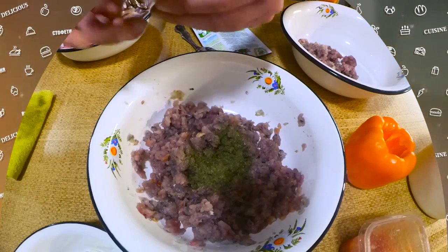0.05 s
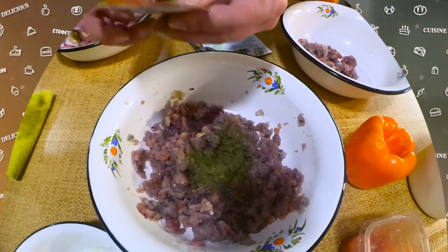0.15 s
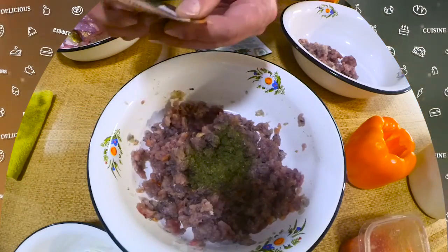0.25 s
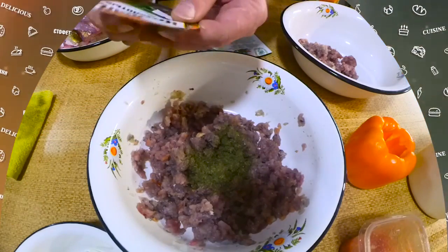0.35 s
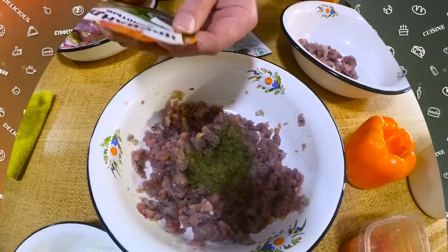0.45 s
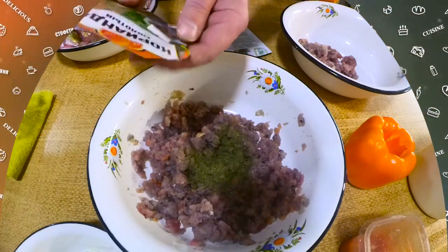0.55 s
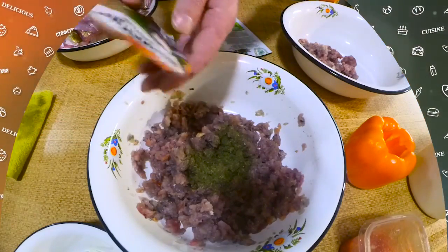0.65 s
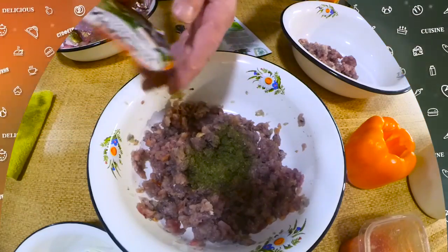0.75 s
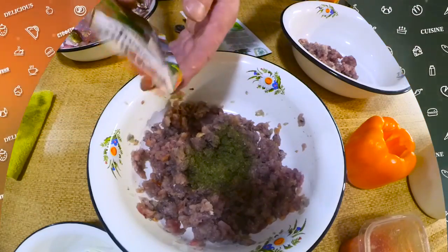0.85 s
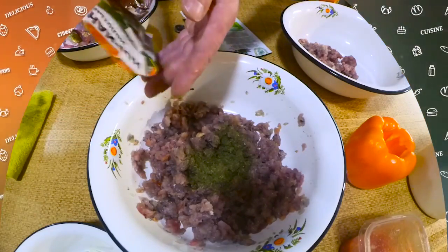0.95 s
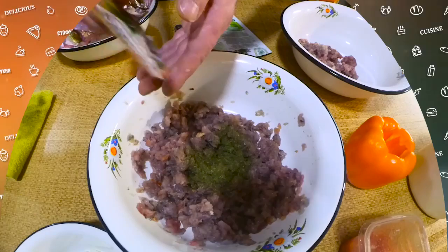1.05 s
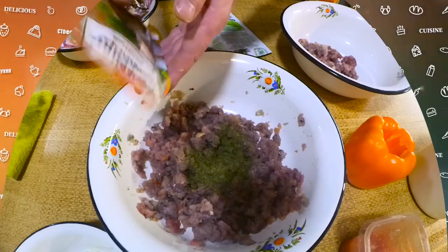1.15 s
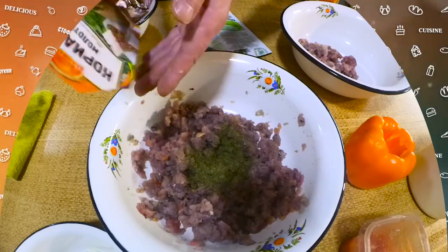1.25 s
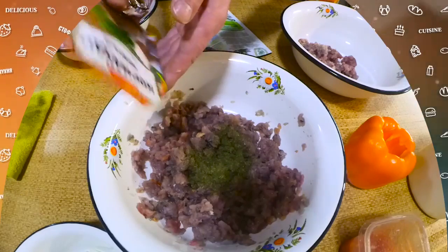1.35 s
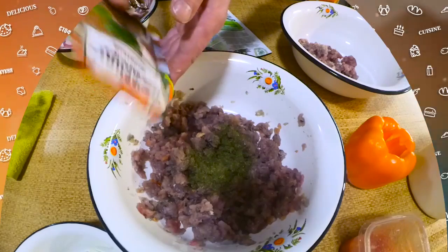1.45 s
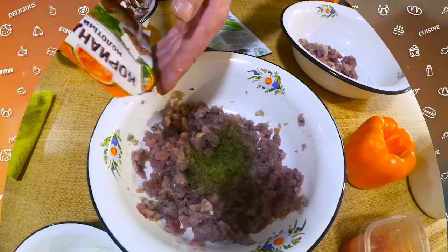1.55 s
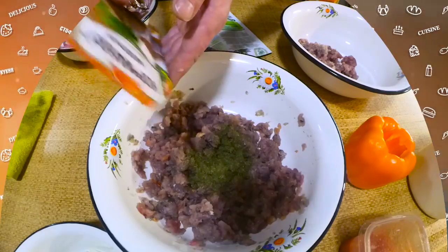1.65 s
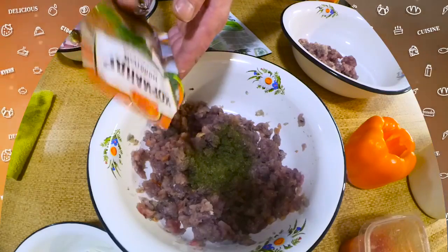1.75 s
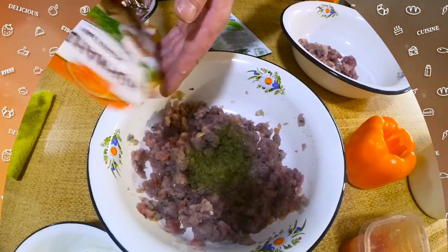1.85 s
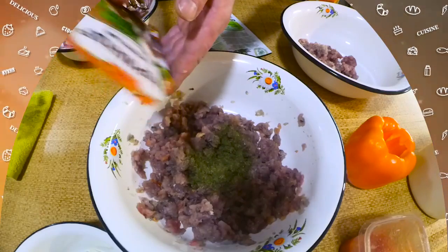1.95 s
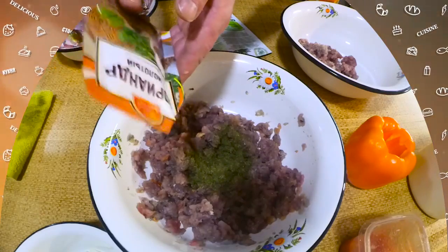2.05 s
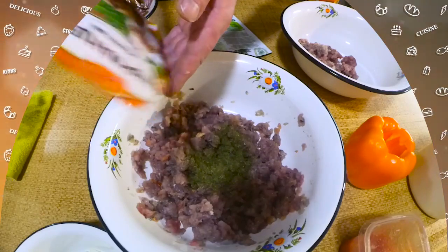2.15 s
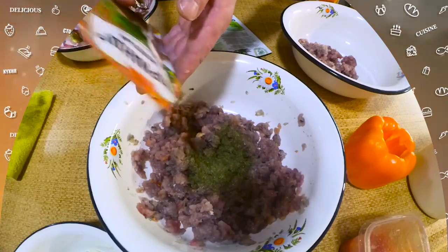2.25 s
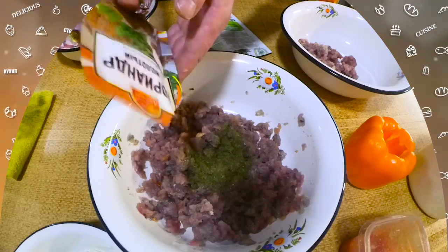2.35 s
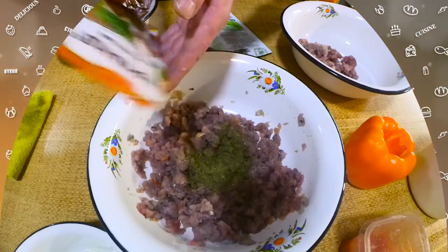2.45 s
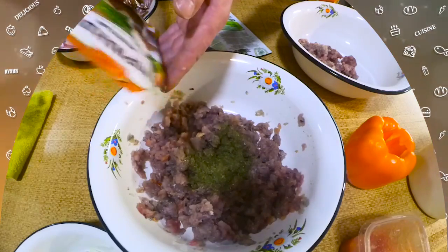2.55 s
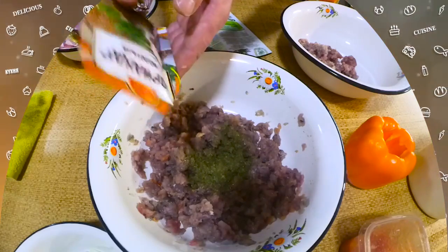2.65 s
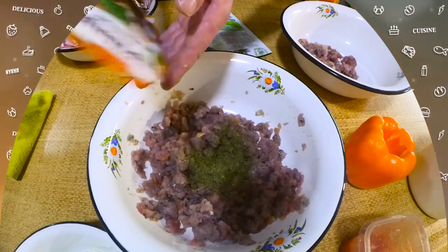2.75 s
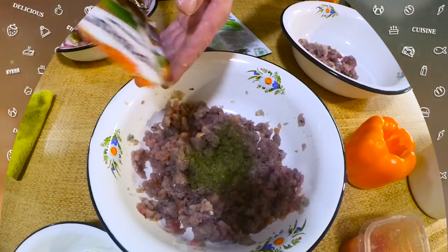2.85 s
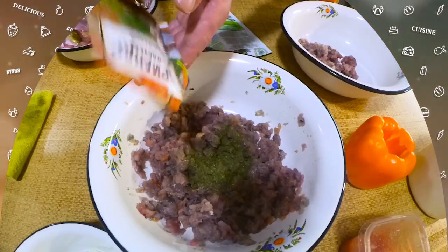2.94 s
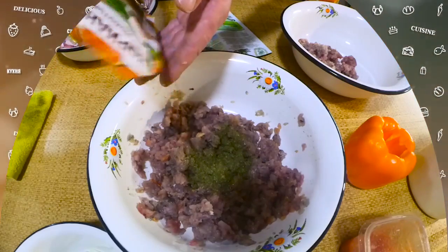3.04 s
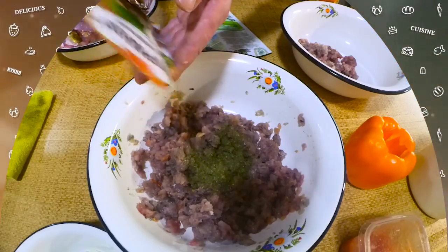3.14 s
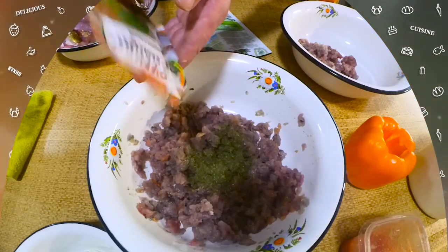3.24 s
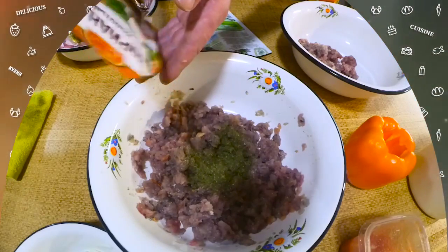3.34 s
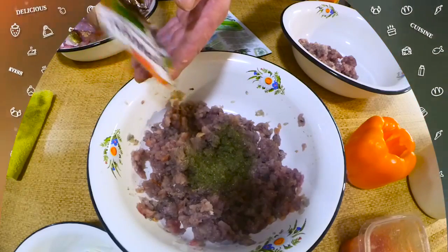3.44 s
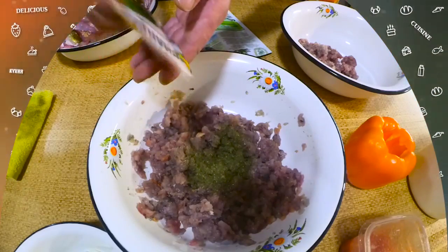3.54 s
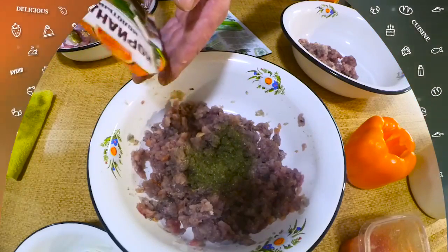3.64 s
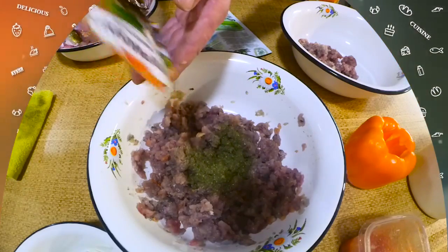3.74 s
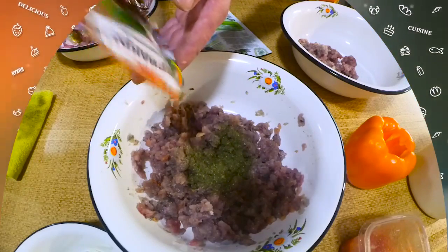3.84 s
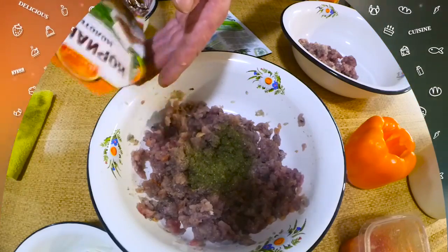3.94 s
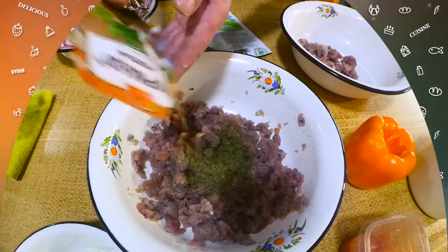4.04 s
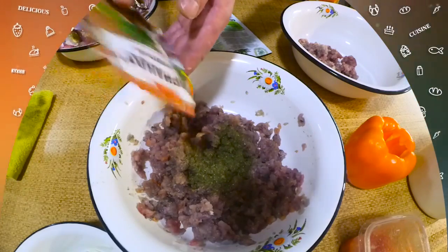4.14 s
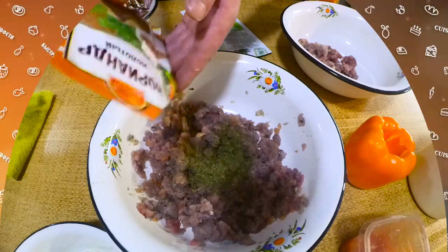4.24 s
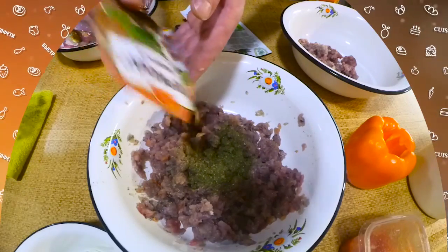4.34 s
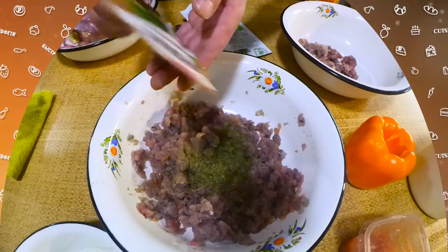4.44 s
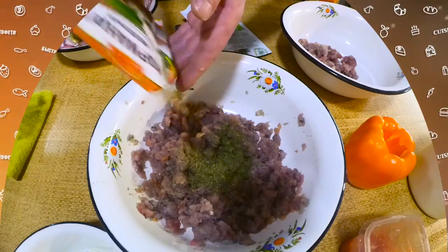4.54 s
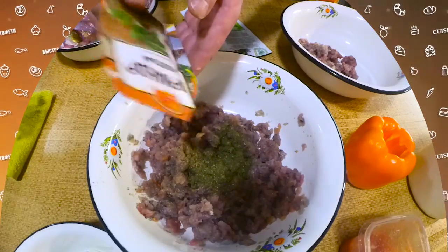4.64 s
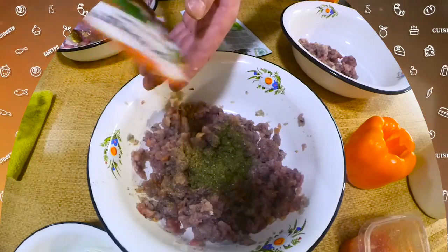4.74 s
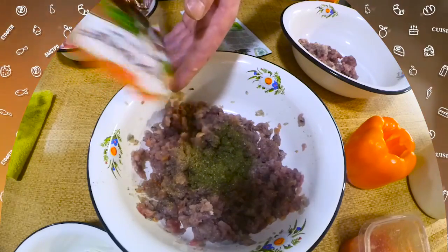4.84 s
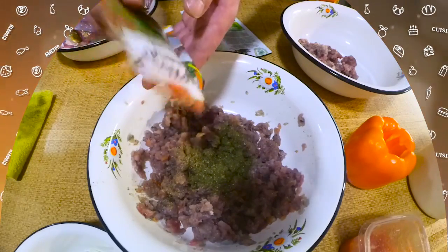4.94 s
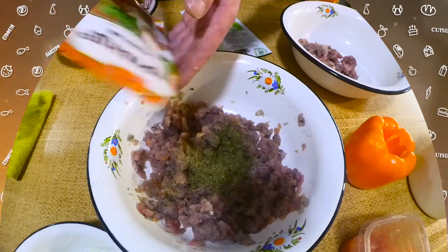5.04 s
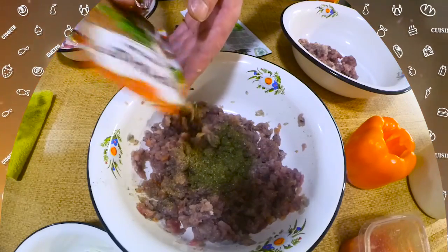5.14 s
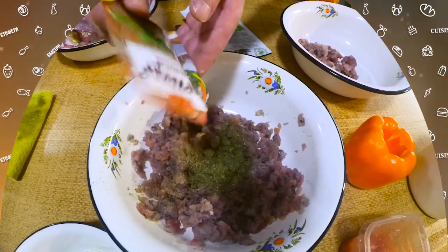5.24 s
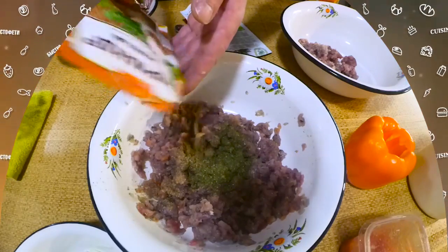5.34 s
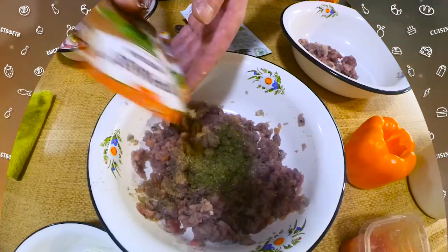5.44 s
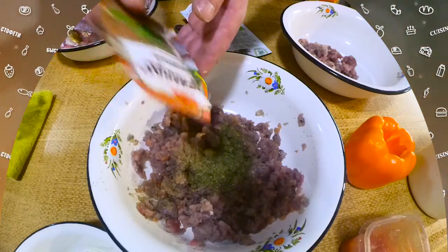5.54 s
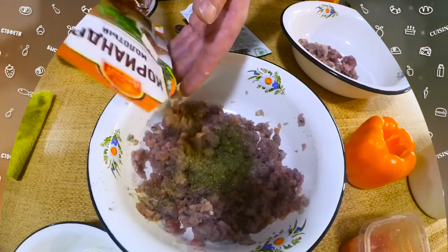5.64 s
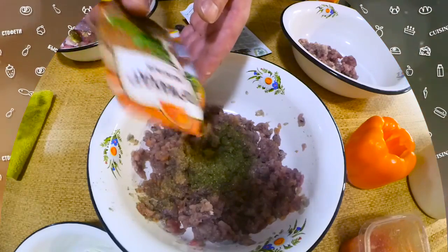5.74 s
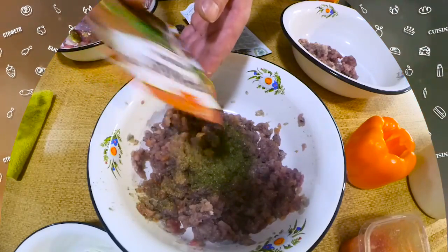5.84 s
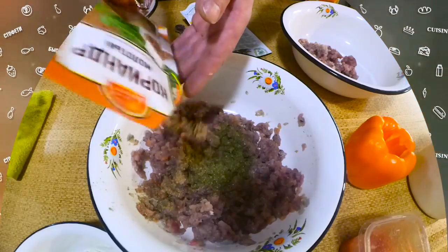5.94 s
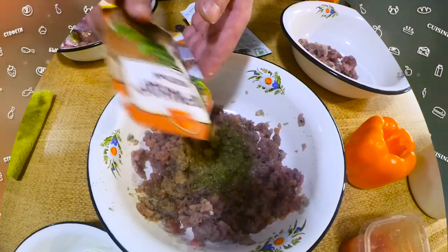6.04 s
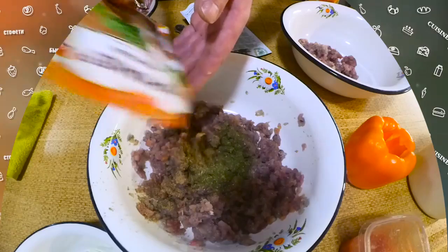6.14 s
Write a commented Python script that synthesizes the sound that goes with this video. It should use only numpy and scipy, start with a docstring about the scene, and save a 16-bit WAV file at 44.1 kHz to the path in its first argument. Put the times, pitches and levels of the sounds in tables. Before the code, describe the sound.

A small paper sachet rustles briefly, then is tapped rapidly against a palm, dry powder hissing with crisp papery ticks, close up in a quiet kitchen.

```python
"""First heard are sparse rustles and crackles as a paper sachet of ground spice is handled in a quiet kitchen.
It is then tapped against a palm about six times a second: filtered noise bursts are the powder rushing along
the paper, resonant clicks are creases snapping, and a bank of resonances is the air ringing inside. Pressure
pulses and low noise are the air that each swing pushes at the microphone. A short noise tail forms the kitchen
reflections; faint shaped noise forms the room rumble and hiss."""
import sys
import numpy as np
from scipy import signal
from scipy.fft import rfft, irfft, next_fast_len
from scipy.io import wavfile
from scipy.ndimage import uniform_filter1d

SR = 44100
rng = np.random.default_rng(int(sys.argv[2]) if len(sys.argv) > 2 else 0)


def wav_out(sig):
    """Save sig, one row per channel (or a flat mono array), as 16-bit PCM at SR to the path in sys.argv[1]."""
    wavfile.write(sys.argv[1], SR, np.round(np.clip(np.atleast_2d(sig).T, -1, 1) * 32767).astype(np.int16))


N = 273023  # samples

# Spectrum of grains on paper: (frequency [Hz], relative level per Hz [dB])
POWDER_SPECTRUM = [(1500, -18.5), (2200, -11), (3900, -2.5), (4700, -3.5), (6200, 0.5), (8500, 0),
                   (11600, -6.5), (14400, -13), (16500, -7)]


def powder():
    """Granular noise: power envelopes of many rushes add; grains sound bright on paper, dull in the hollow."""
    bright_power, dull_power = np.zeros(N), np.zeros(N)
    for peak_s, db, rise_ms, fall_ms, body_db in rushes():
        rise_ms, fall_ms = max(rise_ms, 1), max(fall_ms, 1)
        first, last = max(int((peak_s - .1) * SR), 0), min(int((peak_s + .3) * SR), N)
        at = np.arange(first, last)
        ms = 1000 * (at / SR - peak_s)
        # each rise or fall time spans 20 dB
        shape = np.where(ms < 0, (ms / rise_ms) ** 2, ms / fall_ms)
        power = from_db(2 * db - 40 * shape)
        bright_power[at] += power
        dull_power[at] += power * from_db(2 * body_db)
    clumps = from_db(2.0 * flutter(170))  # the powder arrives in small clumps
    on_paper = coloured(grains(14000, spread_db=1.0), POWDER_SPECTRUM)
    low_boost_db = 0.57 * flutter(23) - grip(column=3)
    on_paper = tilt(on_paper, low_boost_db, 2360)
    inside = rms_one(hollow(grains(5000, spread_db=4.0)))
    return clumps * (np.sqrt(bright_power) * on_paper + from_db(2.5) * np.sqrt(dull_power) * inside)


# Powder shifting in the handled sachet, before tension, clumping and the common 2.5 dB on the hollow part:
# (peak time [s], rms level [dB], rise [ms], fall by 20 dB [ms], hollow body against it [dB])
HANDLING = [(0.006, -37.5, 1.94, 22.5, -1), (0.169, -67, 5, 9, 15), (0.246, -67.5, 2.7, 22, 10),
            (0.287, -41, 1.7, 2.5, 0.5), (0.326, -62, 29, 33, -2), (0.38, -63, 42, 22, 2.5),
            (0.469, -68, 64, 143, -21), (0.595, -50.5, 3.2, 33, 1), (0.622, -55, 3.7, 34, 7),
            (0.804, -41.5, 8.9, 15, 5)]
# Sachet meeting the palm; powder levels as in the handling table, each body level shared by the tap's first five rushes:
# (time [s], sharp suction [dB], slow pressure swing [dB], lead of the powder's start [ms],
# impact powder rms [dB], hollow body against powder [dB], flowing powder rms [dB], delay of settling [ms],
# last trickle rms [dB], delay of the slide back on the backswing [ms], slide rms [dB])
TAPS = [(0.739, -47, -44, 6.5, -45, 7, -54.5, 78, -59, 62, -66),
        (0.924, -36, -57, 0, -45, 0.5, -63, 53, -60, 106.0, -72),
        (1.069, -42.5, -45.5, -4, -41, 3, -54, 41, -53, 112, -60.5),
        (1.225, -43, -37, 2.5, -39.5, -0.5, -49.5, 37, -54, 111, -55),
        (1.376, -35, -38.5, -7, -36.5, -9, -42, 46, -48, 117, -59),
        (1.527, -38.0, -38, -1, -35.5, -4, -44, 53.0, -51, 103, -57.5),
        (1.673, -44, -39.0, 3, -39, -9.5, -39.5, 58.0, -53, 107, -55.5),
        (1.818, -42.5, -38.5, 0.5, -36.0, -12.5, -40.5, 40, -47, 108, -52),
        (1.96, -35.5, -39, -6, -31.5, -9, -38, 47, -42, 113, -52),
        (2.105, -39, -37, 4.5, -31.5, -11, -38, 46, -58, 112, -52),
        (2.265, -44, -45, 3, -41.0, -12, -42.5, 62, -53, 115.0, -57.8),
        (2.406, -46.5, -38.5, 1.0, -36, -12.5, -44.6, 33, -48, 95, -52.5),
        (2.55, -41.5, -39, -1, -32.5, -15.5, -41.9, 51.0, -56, 116, -55.5),
        (2.699, -41.5, -42.5, 2.5, -31.5, -15.1, -40.5, 51.0, -61, 108.0, -56.0),
        (2.861, -43.0, -38, 4.5, -35.5, -15, -44, 32, -50, 107, -55),
        (3.004, -43.5, -38.5, 4, -34, -15, -44, 54.0, -60, 108.0, -53.5),
        (3.156, -38, -39.5, 7.5, -35, -14.5, -40.5, 59, -51.0, 110, -59),
        (3.31, -39.0, -41.0, 7.5, -35, -15.5, -42, 54, -46.5, 99.0, -57),
        (3.456, -48.5, -39.5, 6, -37.5, -15, -41.5, 58, -47.6, 96, -56.5),
        (3.614, -49, -41.5, 4.5, -36.5, -12.5, -44.6, 43, -47, 110, -58.5),
        (3.763, -41.5, -40.5, 7, -36, -14.5, -42.5, 55, -52, 107, -53),
        (3.916, -42, -42.5, 4.5, -38.5, -14.8, -40.5, 56.0, -46.5, 100, -53),
        (4.073, -41, -42, 12.5, -41.5, -13.3, -42, 62, -49.1, 88, -55),
        (4.22, -38.5, -51.0, 6.5, -40, -12.5, -41, 64, -55, 100.0, -59),
        (4.372, -45, -39, 5, -42, -11, -46.0, 48, -59, 100, -54.5),
        (4.526, -42, -41, 11.0, -38.8, -13.5, -41.5, 59, -49, 117, -56.5),
        (4.685, -41.5, -37.5, 12.0, -38, -14, -38.5, 65, -48, 109, -53.5),
        (4.843, -39.5, -38, 16.0, -37, -16, -37.5, 63, -49, 108, -51),
        (5.003, -40, -43, 11.5, -35, -16, -39, 65, -50, 104, -52),
        (5.151, -41, -39.5, 6.5, -39, -15, -38.5, 64, -45, 101, -51),
        (5.305, -46, -35.5, 7.5, -35.9, -13, -43, 65, -49, 98, -52),
        (5.455, -38.5, -43.5, 12.5, -37.5, -9.5, -41.5, 64.0, -43.5, 109, -49.5),
        (5.617, -36.5, -42, 11.5, -35.5, -15, -40.5, 69, -49, 108, -50.5),
        (5.778, -38, -42.5, 11.5, -39, -11.5, -42.5, 67, -45.5, 102, -53),
        (5.927, -39.0, -43, 6.5, -36.5, -11.5, -41, 67, -46, 103, -50),
        (6.083, -37, -40, 14, -35.5, -7, -40.5, 64, -44.5, 97, -50.5)]
# Sachet rebounding off the palm: (time [s], crease peak [dB], shaken powder rms [dB],
# hollow knock against the snap, before its common gain and filters [dB])
REBOUNDS = [(0.7922, -23, -48.5, -23), (0.961, -44, -47.5, -24), (1.108, -47, -49.5, -19),
            (1.261, -37, -45, -22), (1.4237, -14.5, -40, -17), (1.5745, -21, -43.5, -19),
            (1.7189, -20, -42, -19), (1.8663, -19.5, -43, -20), (2.0208, -22, -47, -14),
            (2.1656, -23, -49, -13), (2.3155, -42, -44.5, -16), (2.4511, -25.4, -46, -25),
            (2.5952, -34.5, -48, -16), (2.7459, -24, -45, -16), (2.9005, -29, -44, -14),
            (3.0491, -22.5, -41.5, -23), (3.2024, -25, -41.7, -23), (3.3545, -26, -48, -23),
            (3.5057, -26, -41.5, -21), (3.6574, -24.5, -44.1, -21), (3.8062, -26.5, -43, -24),
            (3.955, -26.5, -44, -14), (4.1105, -24.5, -38, -21), (4.267, -28, -43.5, -19),
            (4.4099, -24.5, -41.5, -19), (4.5669, -22, -42, -17), (4.7297, -28, -40.5, -11),
            (4.89, -25.5, -39.6, -19), (5.0501, -27.5, -39.5, -14), (5.1998, -27.3, -44, -19),
            (5.348, -32.5, -41, -16), (5.5003, -26.9, -44, -21), (5.661, -28, -42, -19),
            (5.8193, -29, -42, -19), (5.9711, -26.5, -40.5, -19), (6.1287, -29, -43, -19)]
# Rushes of a stroke: (rise [ms], fall by 20 dB [ms], hollow body added to the tap's [dB])
START, IMPACT, FLOW = (2.9, 61, -3.1), (8.2, 18.7, 0), (21, 26.6, -1.9)
SHAKEN, TRICKLE = (17, 17, -0.54), (23, 13, -6.5)
SLIDE = (20, 87, -18)  # likewise, but body [dB] against the slide itself
IMPACT_MS, FLOW_MS, START_LOSS_DB = 6.1, 24.3, 2  # delays after the tap; start level below the flow


def rushes():
    """Repeated excitation: every stroke plays the same six rushes of powder at its own moments and levels."""
    rows = list(HANDLING)
    for tap, (rebound_s, _, shaken_db, _) in zip(TAPS, REBOUNDS):
        s, _, _, early_ms, impact_db, body_db, flow_db, settle_ms, trickle_db, back_ms, slide_db = tap
        stroke = [
            (-early_ms, flow_db - START_LOSS_DB, START),
            (IMPACT_MS, impact_db, IMPACT),
            (FLOW_MS, flow_db, FLOW),
            (1000 * (rebound_s - s), shaken_db, SHAKEN),
            (settle_ms, trickle_db, TRICKLE)]
        for ms, db, (rise_ms, fall_ms, more_db) in stroke:
            rows.append((s + ms / 1000, db, rise_ms, fall_ms, body_db + more_db))
        rows.append((s + back_ms / 1000, slide_db, *SLIDE))
    return rows


def grains(per_s, spread_db):
    """Poisson-like impacts: grains hit at random moments, a few much louder than the rest; rms 1."""
    sizes = from_db(spread_db * np.minimum(rng.exponential(1, N), 5))
    signed = sizes * rng.choice([-1, 1], N)
    return rms_one(signed * (rng.random(N) < per_s / SR))


def snaps(after_ms, after_db, crackle_ms, crackle_db):
    """Snap-through: a crease flips with a click, a duller one and a crackle follow, and the hollow is knocked."""
    size = 1024
    out, knocks = np.zeros(N + size), np.zeros(N)
    ms = 1000 * np.arange(size) / SR
    rows = creases()
    noise = rng.standard_normal((len(rows), size))
    chance = rng.uniform(-1, 1, (len(rows), 2))
    for (s, db, hz, body_db), hiss, (late, loud) in zip(rows, noise, chance):
        follow = from_db(crackle_db) * hiss * np.exp(-ms / crackle_ms)
        second = int(after_ms * (1 + .3 * late) * SR / 1000)
        follow[second] -= from_db(after_db + 4 * loud)
        impulse = -1.0 * (ms == 0)
        first = resonate(resonate(impulse, 1.25 * hz, 0.7 * hz), 0.9 * hz, 1.3 * hz)
        click = first + resonate(follow, 0.66 * hz, .5 * hz)
        at = int(s * SR)
        out[at:at + size] += from_db(db) * click / np.abs(click).max()
        knocks[at] = -from_db(db + body_db + 21)
    soft = signal.lfilter([.3], [1, -.7], knocks)
    return out[:N] + hollow(soft)


# Creases snapping besides those of the rebounds: (time [s], peak level [dB], brightness [Hz],
# hollow knock against the snap, before its common gain and filters [dB])
SNAPS = [(0.0072, -33, 5000, -13), (0.02, -28, 4670, -2), (0.1667, -49, 4430, -14), (0.2557, -56, 696, 12),
         (0.2765, -53, 700, -1), (0.3035, -41, 3720, 3), (0.3677, -36.5, 4630, 4.5),
         (0.4144, -46, 3500, 1.5), (0.5106, -49.5, 2500, 7), (0.556, -46, 2500, 12),
         (0.5943, -20.5, 3620, -18), (0.6231, -25.5, 4000, 2), (0.7356, -30, 2980, -13),
         (0.748, -34, 6800, -8), (0.8041, -20, 6000, -11), (0.8116, -29, 4740, 0), (0.9224, -35, 3420, 13),
         (1.0742, -31.5, 4250, 9.5), (1.0962, -28, 4300, -9), (1.2283, -28.5, 4970, 10),
         (1.3758, -30.5, 6000, 4.5), (1.3796, -19.5, 5100, -6), (1.5354, -46, 6940, -21),
         (1.5498, -34, 2470, 6.5), (1.67, -23, 5260, -6), (1.6908, -20, 4220, -12), (1.729, -30, 3370, -3),
         (1.83, -23, 5600, -18), (1.915, -25, 4200, -8), (1.9705, -32, 2600, -8), (2.0112, -29, 2400, -12),
         (2.063, -20, 4540, -24), (2.1022, -25, 2700, -14), (2.1154, -14.5, 4900, -9.5),
         (2.2036, -20, 4540, -16), (2.2537, -40, 5430, -21), (2.4007, -36, 5800, -15),
         (2.4654, -24.5, 2630, -21), (2.4985, -18.5, 4200, -16), (2.568, -27, 4900, 3.5),
         (2.5956, -49, 6800, -9), (2.967, -38, 5440, -19), (3.327, -28, 6750, -36),
         (3.4628, -25, 8100, -43), (3.5547, -36.5, 5270, -27), (4.0477, -42, 7250, -3),
         (4.5426, -27, 7100, -30), (4.929, -38.5, 775, -22), (5.1576, -21, 7600, -17),
         (5.227, -47, 900, -3), (5.47, -36, 3000, 6.5), (5.606, -31, 7140, -33), (5.7749, -27.5, 5600, -8),
         (6.0813, -25, 5700, -2)]
REBOUND_HZ = 4790  # brightness of the crease that snaps on the rebound
TICK_DB, TICK_HZ, TICK_BODY_DB = 12, 6200, -27  # peak over slide level, middle brightness, knock against tick


def creases():
    """Discrete events: the listed snaps, one snap at each rebound and a faint paper tick on each backswing."""
    rows = SNAPS + [(s, db, REBOUND_HZ, body_db) for s, db, _, body_db in REBOUNDS]
    for (s, *_, back_ms, slide_db), (late, bright) in zip(TAPS, rng.uniform(-1, 1, (len(TAPS), 2))):
        at_s = min(s + (back_ms + 25 * late) / 1000, N / SR - .001)
        rows.append((at_s, slide_db + TICK_DB, TICK_HZ * (1 + .2 * bright), TICK_BODY_DB))
    return rows


# Modes of the sachet body: (frequency [Hz], width [Hz], level before grip and wavering [dB])
HOLLOW_MODES = [(192, 160, -11), (317, 430, -7.5), (548, 40, -4.5), (621, 29, -4), (980, 410, -4),
                (1205, 112, 0), (1546, 98, -1), (2200, 3100, -18.5)]


def hollow(x):
    """Modal resonance: the half-empty sachet rings in its modes; each wavers as the paper flexes."""
    out, slack_db, pocket_db = 0, grip(column=1), grip(column=2)
    for hz, width_hz, db in HOLLOW_MODES:
        held_db = slack_db * (hz < 800) + pocket_db * (1100 < hz < 1700)
        gain = from_db(db + held_db + 1.6 * flutter(20))
        out = out + gain * resonate(x, hz, width_hz)
    return out


# How the sachet is held: (time [s], slack wall lift of modes under 800 Hz [dB],
# air pocket lift of modes at 1.1-1.7 kHz [dB], paper tension that thins the powder's lows [dB])
GRIP = [(0, 8.5, 0.5, -24), (.6, 0, -15.5, -15.5), (1.2, -4, 2, 4), (1.6, 1.5, 2, -5), (2.1, 1, 1, -5),
        (2.6, 2.5, 1, 3), (3.5, 7, 1.5, 0), (4.4, -0.5, 0, -3.5), (5, 8, -4, -0.5), (5.6, 5, -10.5, -2),
        (6.2, -1.5, -10, -4.5)]


def grip(column):
    """Slowly varying boundary condition: one grip column interpolated linearly to every sample."""
    points = np.array(GRIP)
    return np.interp(np.arange(N) / SR, points[:, 0], points[:, column])


def slaps():
    """Impact noise: paper first touches skin in a short flat burst, part of it through the hollow."""
    burst = after_taps(column=1, lead_ms=3.5, fade_ms=9.9) * rng.standard_normal(N)
    return from_db(-13) * resonate(burst, 5000, 8000) + from_db(4.0) * hollow(burst)


def puffs(suck_ms, push_ms, push_db, swing_hz, swing_ms, rebound_ms, rebound_db):
    """Displaced air: landing sucks sharply and pushes back, pressure rocks once, and the rebound flicks it."""
    lead = SR // 50
    out, ms = np.zeros(N + SR), 1000 * np.arange(-lead, SR // 5) / SR
    for (s, suck_db, swing_db, *_), (late, loud) in zip(TAPS, rng.uniform(-1, 1, (len(TAPS), 2))):
        flick_shape = np.exp(-((ms - rebound_ms - 6 * late) / (2.1 * suck_ms)) ** 2)
        flick = from_db(rebound_db + 6.7 * loud) * flick_shape
        push = from_db(push_db) * np.exp(-((ms - push_ms) / (0.29 * push_ms)) ** 2)
        suck = np.exp(-(ms / suck_ms) ** 2) + flick - push
        swing = np.sin(2 * np.pi * swing_hz * ms / 1000) * np.exp(-(ms / swing_ms) ** 2) * (ms > 0)
        at = int(s * SR) - lead
        out[at:at + len(ms)] += from_db(swing_db) * swing - from_db(suck_db) * suck
    return out[:N]


def gusts():
    """Turbulence: stirred air tumbles past the microphone at each tap as low band noise."""
    band = signal.butter(2, [28, 110], "band", fs=SR, output="sos")
    swirl = rms_one(signal.sosfilt(band, rng.standard_normal(N)))
    strength = uniform_filter1d(after_taps(column=2, lead_ms=4.6, fade_ms=39.4), size=300)
    return from_db(-11.5) * strength * swirl


def after_taps(column, lead_ms, fade_ms):
    """Exponential decay: an envelope jumps up just before each tap, to the level in one tap column."""
    hits = np.full(N, 1e-18)
    for row in TAPS:
        hits[int((row[0] - lead_ms / 1000) * SR)] = from_db(row[column])
    return signal.lfilter([1], [1, -np.exp(-1000 / (fade_ms * SR))], hits)


def kitchen(x, t60_s, wall_hz):
    """Reverberation: reflections from bowl, table and walls form a dying, dulled noise tail."""
    t = np.arange(SR // 4) / SR
    tail = rng.standard_normal(len(t)) * from_db(-60 * t / t60_s) * (t > .003)
    tail = signal.sosfilt(signal.butter(1, wall_hz, fs=SR, output="sos"), tail)
    return signal.oaconvolve(x, tail / np.sqrt(np.sum(tail ** 2)))[:N]


# Spectra of the room noise, common to both sides and opposite on them:
# (frequency [Hz], relative level per Hz [dB])
ROOM_SPECTRUM = [(12, -15), (20, 14.5), (39, -5.5), (70, -5.5), (120, -15), (200, -17), (377, -29),
                 (558, -29.5), (800, -31.5), (2990, -31.5), (4180, -41), (5380, -28), (14300, -36),
                 (16400, -52)]
SIDE_SPECTRUM = [(12, -32), (20, 11), (25, 10), (33, 3), (205, -28.5), (847, -76), (1260, -85), (4000, -83),
                 (5200, -96), (8800, -120)]


def room_noise(spectrum, db, waver_db, waver_rate):
    """Stationary background: noise shaped to a spectrum, its level (rms before wavering) drifting by chance."""
    level = from_db(db + waver_db * flutter(waver_rate))
    return level * coloured(rng.standard_normal(N), spectrum)


def from_db(db):
    """Logarithmic level: the amplitude gain of a level in dB."""
    return 10 ** (np.asarray(db) / 20)


def rms_one(x):
    """Effective value: the signal scaled to rms 1."""
    return x / np.sqrt(np.mean(x ** 2) + 1e-20)


def resonate(x, hz, width_hz):
    """Damped oscillator: a two-pole resonance with gain 1 on top."""
    r = np.exp(-np.pi * width_hz / SR)
    zeros = np.array([1, 0, -1]) * (1 - r * r) / 2
    poles = [1, -2 * r * np.cos(2 * np.pi * hz / SR), r * r]
    return signal.lfilter(zeros, poles, x)


def coloured(x, spectrum):
    """Spectral shaping: weights the Fourier components by (frequency [Hz], level per Hz [dB]); rms 1."""
    size = next_fast_len(N)
    hz = np.arange(size // 2 + 1) * SR / size + 1
    points = np.array(spectrum)
    db = np.interp(np.log(hz), np.log(points[:, 0]), points[:, 1], left=-90)
    return rms_one(irfft(rfft(x, size) * from_db(db), size)[:N])


def flutter(rate):
    """Low-passed noise: smooth chance wavering about rate times a second; rms 1."""
    r = np.exp(-2 * np.pi * rate / SR)
    return rms_one(signal.lfilter([1], [1, -2 * r, r * r], rng.standard_normal(N)))


def tilt(x, db, hz):
    """Shelving filter: what lies under hz is raised by db, which may change in time."""
    low = signal.sosfiltfilt(signal.butter(1, hz, fs=SR, output="sos"), x)
    return x + (from_db(db) - 1) * low


def scene():
    """Superposition: the sachet is central; only dull reflections and low room noise differ between sides."""
    sachet = powder() + slaps()
    sachet += snaps(after_ms=.8, after_db=-0.5, crackle_ms=1.84, crackle_db=-15.5)
    air = gusts() + puffs(suck_ms=2.22, push_ms=9.1, push_db=-13.0, swing_hz=14.4, swing_ms=89,
                          rebound_ms=56, rebound_db=-18)
    room = room_noise(ROOM_SPECTRUM, db=-55.5, waver_db=1.5, waver_rate=4)
    side = room_noise(SIDE_SPECTRUM, db=-67, waver_db=0.93, waver_rate=24)
    dull = signal.sosfilt(signal.butter(2, [60, 700], "band", fs=SR, output="sos"), sachet + air)
    side += from_db(-45.0) * kitchen(dull, t60_s=0.015, wall_hz=900)
    reflections = from_db(-20.0) * kitchen(sachet, t60_s=0.38, wall_hz=6000)
    mid = sachet + reflections + air + room
    return mid + side * np.array([[1], [-1]])


# Constant converter offset, one row for left and one for right: (offset [full scale])
OFFSET = [
    [.0049],
    [-.0073],
]
CUTOFF_HZ = 16500


def record(dry):
    """Band limiting: the microphone rolls off at the top, a steep cut follows, and a constant offset is added."""
    rolled = signal.sosfilt(signal.cheby2(8, 22, 15550, fs=SR, output="sos"), dry)
    return signal.sosfilt(signal.cheby2(12, 60, CUTOFF_HZ, fs=SR, output="sos"), rolled) + OFFSET


dry = scene()
out = record(dry)
wav_out(out)
```